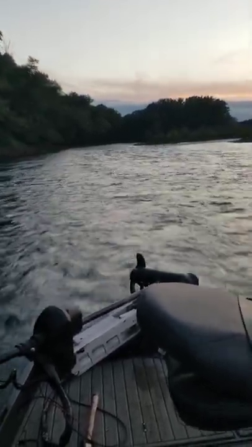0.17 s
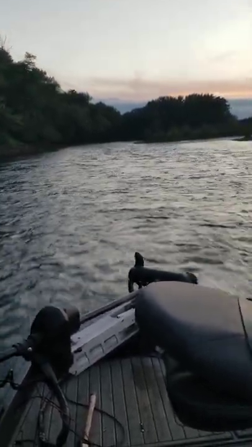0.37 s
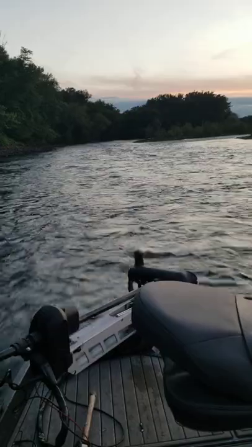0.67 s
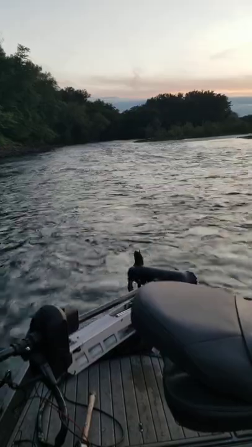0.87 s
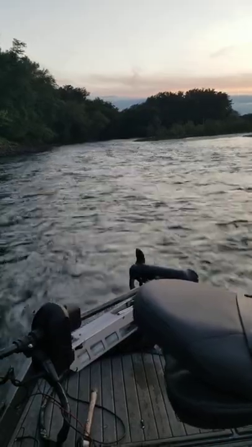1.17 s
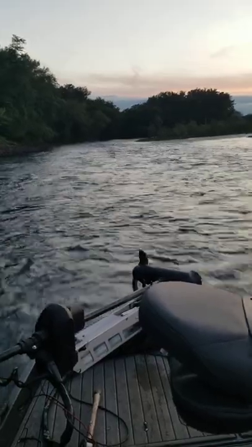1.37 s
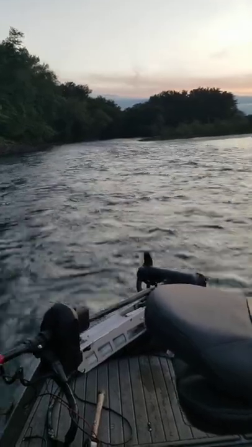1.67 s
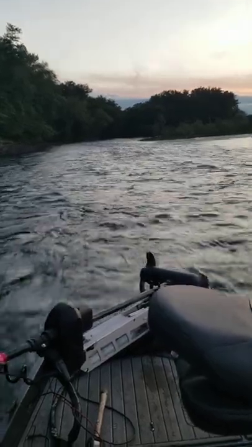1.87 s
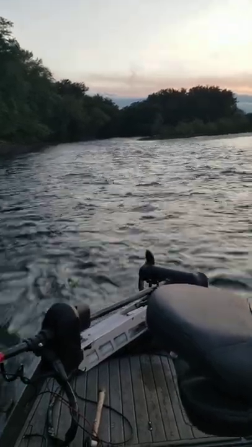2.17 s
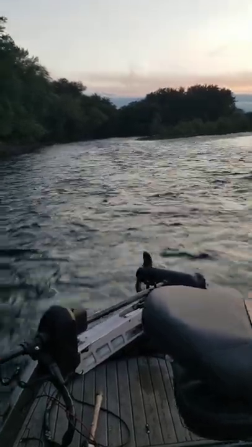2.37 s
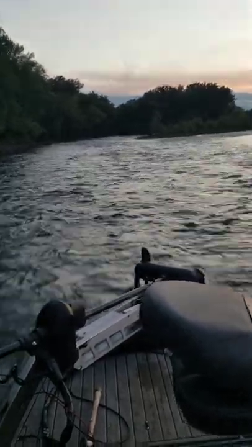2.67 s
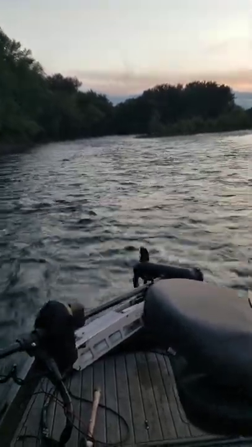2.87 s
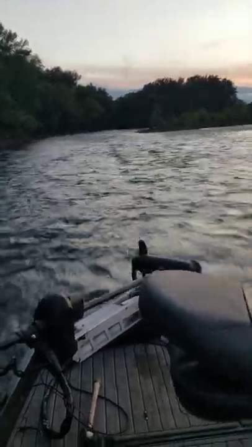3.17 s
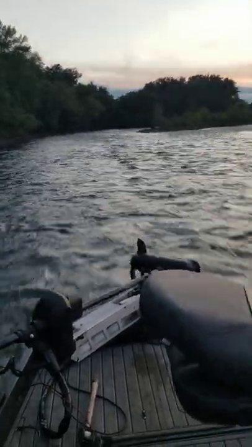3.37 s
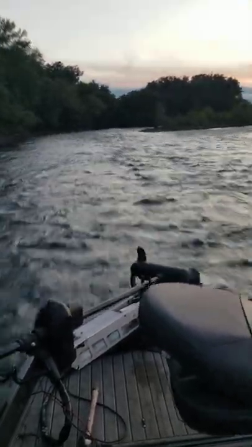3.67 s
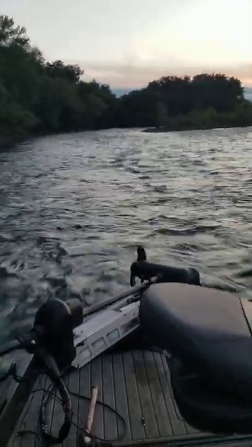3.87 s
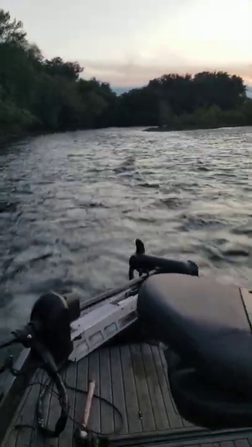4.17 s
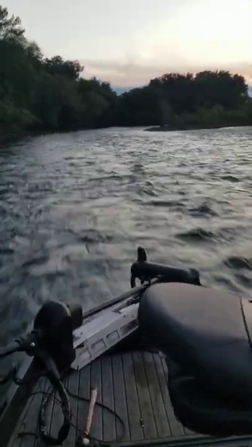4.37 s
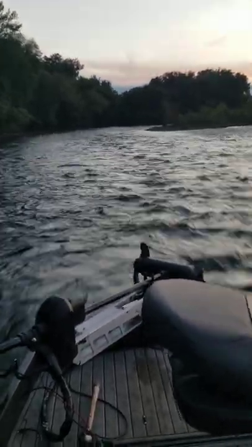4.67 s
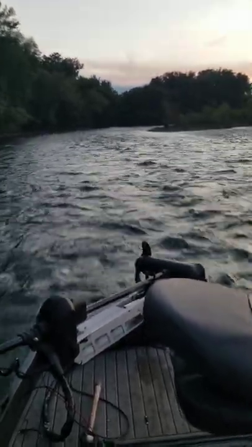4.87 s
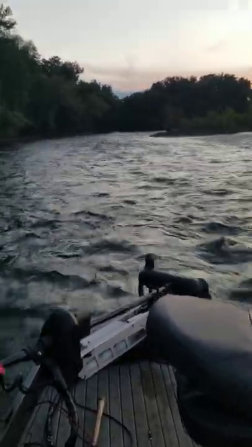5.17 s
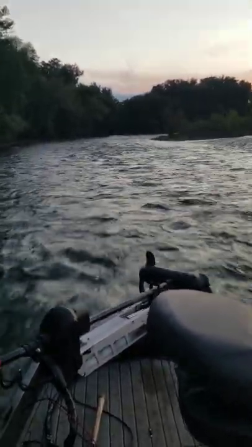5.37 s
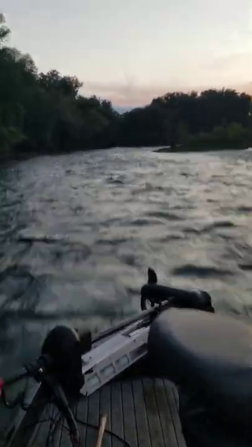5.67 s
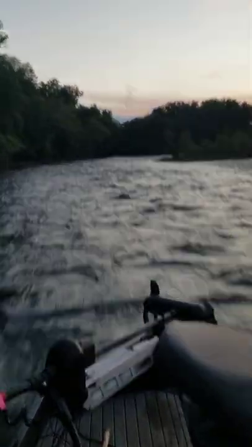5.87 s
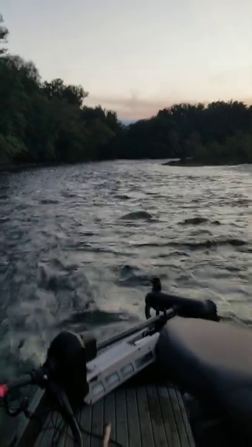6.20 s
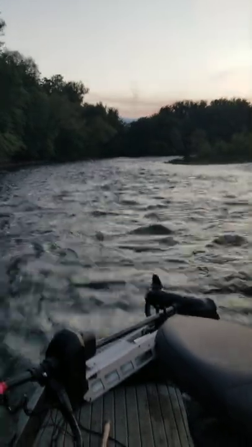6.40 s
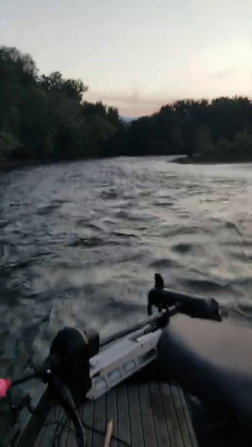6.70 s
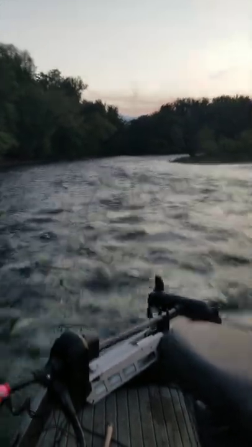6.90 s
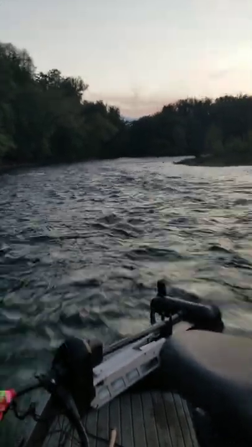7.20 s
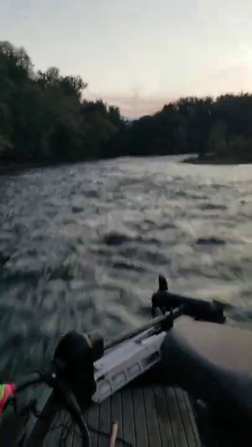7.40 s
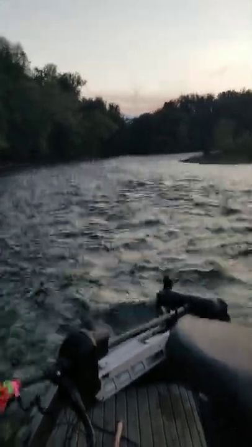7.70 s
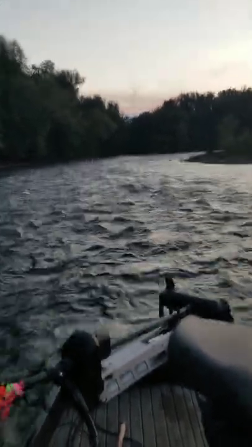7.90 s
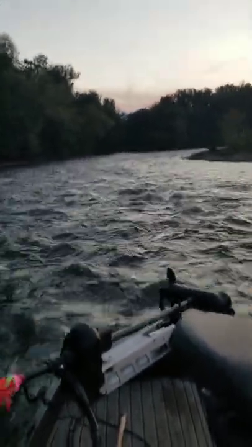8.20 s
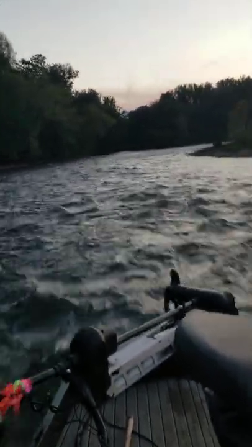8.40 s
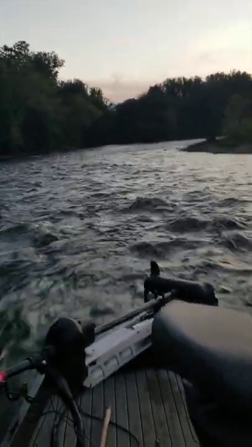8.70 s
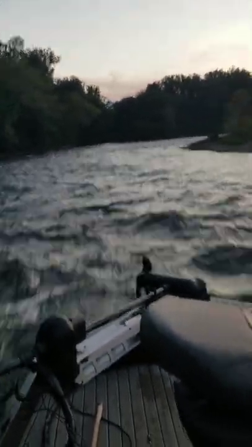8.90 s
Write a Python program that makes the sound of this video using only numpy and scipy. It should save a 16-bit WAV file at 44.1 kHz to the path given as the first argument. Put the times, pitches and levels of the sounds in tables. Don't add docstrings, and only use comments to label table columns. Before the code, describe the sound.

Steady run upriver in a motorboat: deep pulsing hum, faint high whine, rushing wind and water, sharp little slaps on sheet metal.

```python
import sys
import numpy as np
from scipy import signal
from scipy.fft import rfft, irfft, next_fast_len
from scipy.io import wavfile
from scipy.ndimage import uniform_filter1d

SR = 44100
rng = np.random.default_rng(int(sys.argv[2]) if len(sys.argv) > 2 else 0)


def to_wav(s):
    ch = np.atleast_2d(s).T
    pcm = np.round(np.clip(ch, -1, 1) * 32767)
    wavfile.write(sys.argv[1], SR, pcm.astype(np.int16))


def magnitude_from_level(level_db):
    exponent = np.asarray(level_db, float) / 20
    return 10 ** exponent


N = 399098
SIZE = next_fast_len(N)

# [multiple of its rate, left level/dB, right level/dB, lag of the left port/rad]
SHAFT_TONES = [(1, -20.0, -20.0, 0.3), (2, -31.0, -30.0, 0.5), (3, -42.0, -42.0, 0.5),
               (4, -35.0, -34.0, 0.6), (5, -31.0, -33.0, 0.9), (6, -30.0, -30.0, 0.7),
               (7, -35.0, -36.0, 1.4), (8, -39.0, -42.0, 0.8), (9, -40.0, -43.0, 1.1),
               (10, -41.5, -41.5, 0.2), (11, -41.0, -47.0, -2.6), (12, -44.0, -36.0, 1.9),
               (13, -42.0, -41.0, 2.6), (14, -43.0, -37.0, -3.0), (15, -49.0, -47.0, -3.0),
               (16, -54.0, -50.0, -0.7), (17, -52.0, -52.0, 2.8), (18, -60.0, -50.0, -0.4),
               (19, -41.0, -36.0, -1.5), (20, -60.0, -47.0, -2.8), (21, -64.0, -60.0, 1.8),
               (22, -68.0, -60.0, -0.8), (23, -61.0, -55.0, -0.0), (24, -60.0, -54.0, 0.8),
               (25, -53.0, -58.0, -1.5), (26, -62.0, -60.0, 2.3)]
SPREAD = 0.4
HUNT_HZ = 0.09
CRUISE_HZ = 79.37
OCTAVE_DB_PER_HZ, THIN_DB_PER_HZ = 8, 0.5

# [t/s, f/Hz, level/dB]
WHINE = [(0, 1507, -42), (0.25, 1507, -41), (0.5, 1497, -48), (0.8, 1501, -42), (1.75, 1508, -41),
         (2.6, 1507, -39), (2.9, 1503, -43), (3.2, 1507, -38), (4.2, 1506, -41), (4.47, 1512, -44),
         (4.85, 1501, -41), (5.15, 1504, -44), (5.4, 1511, -39), (5.97, 1510, -45), (6.3, 1514, -41),
         (6.75, 1510, -39), (7.5, 1507, -43), (8.1, 1513, -41)]
BLADE_MULTIPLE = 19

# [loudest t/s, level/dB, out-of-step t/s before it, dip/dB]
THROBS = [(0.24, 5.5, -0.1, 10), (0.9, 3, 0.53, 16), (1.74, 5, 1.25, 8), (2.47, 3.5, 2.04, 14),
          (3.17, 4.5, 2.8, 8), (3.7, -1, 3.54, 14), (4.1, 5, 3.87, 10), (4.48, 0, 4.38, 9),
          (4.75, 5, 4.6, 11), (5.44, 5, 5.2, 20), (6.15, 5.5, 5.8, 14), (6.76, 3, 6.62, 15),
          (7.63, 6, 7.3, 20), (8.33, 2, 8.08, 24), (8.93, 2, 8.75, 17), (9.5, 2, 9.12, 12)]
THROB_PEAK = 2.6

# [multiple of its rate, level/dB]
ROTOR_TONES = [(3, -37.5), (4, -45), (5, -41.5), (9, -55)]
SLIP_HZ = 1.36

# [f/Hz, width/Hz, level/dB]
PANELS = [(250, 40, -37), (443, 16, -34.5), (519, 24, -37), (600, 60, -46), (830, 30, -51), (985, 30, -46),
          (1262, 25, -53), (2520, 150, -53), (3150, 120, -56), (4080, 400, -58)]

# [f/Hz, left level/dB per Hz, right level/dB per Hz]
RUSH = [(22, -82, -73), (46.7, -45, -52.5), (70, -42.5, -46.5), (110, -50, -45), (187, -51, -44.5),
        (360, -56, -48), (620, -61, -55.5), (1150, -67, -63), (1750, -74, -69), (2600, -75.5, -73),
        (5480, -85.5, -82), (7100, -93.5, -92.5), (11100, -97, -87.5), (11950, -96, -82.5)]
LAG_S = 0.00048

# [t/s, length/s, buffet level/dB, wind level/dB]
GUSTS = [(0.7, 0.14, 0, -0.5), (1.03, 0.47, 5.5, -1), (2.598, 0.17, 2, 0), (3.25, .25, 6, 0.5),
         (3.61, .12, 4, 0.5), (3.927, 0.14, 7, 1), (4.384, .12, 5, -0.5), (4.66, 0.24, -3, 1.5),
         (5.25, 0.58, 5, 3), (5.903, 0.26, 8, 3), (6.693, 0.097, 8, 1.5), (7.002, 0.32, 3, 1),
         (7.64, 0.16, -3, -1), (7.855, 0.14, 7, 2.5), (8.32, 0.23, 4, 0.5), (8.79, 0.2, 4, 3.5)]
BUFFET_SWAY_DB, WIND_SWAY_DB, LULL_DB = 1, 0.7, 4.2

# [t/s, level/dB against its mean]
SPRAY = [(0, 2.5), (0.35, 0), (2.1, 2.5), (2.45, 1), (3.2, 2), (3.5, -0.5), (3.7, 2.2), (4.35, 2.5),
         (4.75, 3), (5.3, 3.5), (5.6, 1.5), (7.05, 2), (7.3, 5), (7.5, 2.5), (8.2, 2), (8.47, 3.5),
         (8.65, 5), (9.0, 3)]
SHEET_DB, SHEET_S = 2.5, 0.057

# [t/s, peak level/dB, ring f/Hz, fizz level/dB against the ring]
SLAPS = [(0.9472, -31, 3240, -19), (0.9867, -29, 2910, -15), (2.9597, -26, 3900, -19),
         (3.817, -29, 2920, -18), (4.395, -21.5, 2720, -8), (4.4638, -25.5, 2620, -16),
         (4.7965, -24.5, 3030, -27), (5.162, -29, 3040, -12), (5.2165, -26, 2720, -22),
         (5.469, -23.5, 2660, -22), (5.694, -26, 3590, -10), (5.708, -18, 2520, -8),
         (5.727, -32, 2700, -23), (5.8803, -25.5, 2690, -18), (5.9577, -25, 2720, -11),
         (6.0615, -25, 2560, 0), (6.4727, -28, 3680, -15), (6.6757, -22.5, 3070, -10),
         (7.225, -28, 3050, -13), (7.443, -25.5, 2590, -3), (7.651, -26, 2600, -13),
         (7.8094, -23, 3220, -2), (7.8526, -26, 2980, -13), (7.873, -18.5, 3060, -19),
         (7.9526, -23, 3160, -14), (8.072, -22, 3000, -5), (8.3719, -29, 3290, -7),
         (8.6133, -33, 3090, -14), (8.754, -26, 3100, -19), (8.9366, -30, 3000, -25)]
CRACK_DB, CRACK_PER_FIZZ = -20, 0.42
SLAP_FADE_S = 0.046


def curves(table):
    s, *columns = np.transpose(table)
    return [np.interp(np.arange(N) / SR, s, column) for column in columns]


def walk(rate):
    hold = int(SR / rate)
    steps = np.repeat(rng.standard_normal(N // hold + 1), hold)
    smooth = uniform_filter1d(uniform_filter1d(steps, hold), hold)
    return 1.23 * smooth[:N]


def ring(x, hz, width_hz):
    return signal.lfilter(*signal.iirpeak(hz, hz / width_hz, fs=SR), x)


def ports(x, lag_s, pan_db=0):
    left = np.roll(x, int(lag_s * SR)) * magnitude_from_level(pan_db / 2)
    return np.array([left, x * magnitude_from_level(-pan_db / 2)])


def throb():
    t = np.arange(N) / SR
    loud_s, top_db, weak_s, dip_db = np.transpose(THROBS)
    half_turns = np.interp(t, np.ravel([weak_s, loud_s], "F"), np.arange(2 * len(THROBS)))
    trough = magnitude_from_level(-np.interp(t, weak_s, np.abs(dip_db)))
    in_step = np.abs(np.sin(np.pi / 2 * half_turns)) ** THROB_PEAK
    power = trough ** 2 + (1 - trough ** 2) * in_step
    return np.interp(t, loud_s, top_db) + 10 * np.log10(power)


def motor(turns):
    out, left = np.zeros((2, N)), np.array([[1], [0]])
    whine_hz, whine_db = curves(WHINE)
    faster_hz = whine_hz / BLADE_MULTIPLE - CRUISE_HZ
    octave_db = OCTAVE_DB_PER_HZ * faster_hz + 2.5 * walk(10)
    whine_db = whine_db - np.median(whine_db) + 0.6 + 1.3 * walk(14)
    special_db = {1: throb(), 2: octave_db, BLADE_MULTIPLE: whine_db}
    for k, left_db, right_db, late in SHAFT_TONES:
        start = SPREAD * k ** 2 + 0.6 * walk(6)
        if k in special_db:
            sway_db = special_db[k]
        else:
            sway_db = 1.2 * walk(3) + 2.2 * walk(14) - THIN_DB_PER_HZ * k * faster_hz
        level = magnitude_from_level(np.array([[left_db], [right_db]]) + sway_db)
        out += np.sqrt(2) * level * np.cos(2 * np.pi * k * turns - late * left + start)
    rotor_turns = turns - SLIP_HZ * np.arange(N) / SR
    for k, db in ROTOR_TONES:
        level = magnitude_from_level(db + 0.73 * walk(1.83))
        out += np.sqrt(2) * level * np.cos(k * (2 * np.pi * rotor_turns - 0.12 * left))
    return out


def panels():
    out = np.zeros(N)
    for hz, width_hz, db in PANELS:
        drone = ring(ring(rng.standard_normal(N), hz, width_hz), hz, 2 * width_hz)
        out += magnitude_from_level(db) * drone / drone.std()
    return ports(out, 0.00028, pan_db=4.5)


def swells(rows):
    t = np.arange(0, N / SR + 0.01, 0.005)
    db = sum(top * np.exp(-(2 * (t - s) / length) ** 2) for s, length, top in rows)
    return np.interp(np.arange(N) / SR, t, db)


def weather():
    gusts = np.array(GUSTS)
    buffet = LULL_DB + swells(gusts[:, [0, 1, 2]]) + BUFFET_SWAY_DB * walk(9)
    wind = LULL_DB / 2 + swells(gusts[:, [0, 1, 3]]) + WIND_SWAY_DB * walk(9)
    sheets = []
    for s, db, _, fizz_db in SLAPS:
        fizzy = np.clip((db + fizz_db + 49) / 12, 0, 1)
        sheets.append((s + SHEET_S / 4, SHEET_S, SHEET_DB * fizzy))
    spray = curves(SPRAY)[0] + swells(sheets)
    return np.array([buffet, wind, 0.28 * spray, spray])


def rush(turns):
    hz = np.arange(SIZE // 2 + 1) * SR / SIZE + 1e-3
    table_hz, *port_levels = np.transpose(RUSH)
    colour = np.array([magnitude_from_level(np.interp(np.log(hz), np.log(table_hz), db)) for db in port_levels])
    own = rfft(rng.standard_normal((2, SIZE)))
    common = rfft(rng.standard_normal(SIZE))
    delay = np.exp(-2j * np.pi * hz * LAG_S * np.array([[1], [0]]))
    share = 0.38 / (1 + (hz / 1500) ** 4) + 0.28 / (1 + (hz / 60) ** 4)
    noise = np.sqrt(1 - share) * own + np.sqrt(share) * common * delay
    noise = noise * colour * np.sqrt(SR / 2)
    controls = weather()
    where = np.log([50, 180, 5000, 11000])
    out, gurgle = np.zeros((2, N)), walk(12)
    for step in range(20):
        place = 2 * np.log2(hz / 22) - step
        window = np.cos(np.pi / 2 * np.clip(place, -1, 1)) ** 2
        band = irfft(noise * window, SIZE)[:, :N]
        centre = np.log(22) + step * np.log(2) / 2
        weights = np.array([np.interp(centre, where, row) for row in np.eye(4)])
        wet = weights[2] + weights[3]
        flicker_db = 0.7 * np.array([walk(14), walk(14)])
        out += band * magnitude_from_level(weights @ controls + wet * (0.6 * gurgle + flicker_db))
    return out * (1 + 0.04 * np.cos(2 * np.pi * turns))


def peak_one(x):
    return x / np.abs(x).max()


def slap(peak_db, hz, crack_db, fizz_db, fade_s):
    t = np.arange(int(0.08 * SR)) / SR
    hit, foam, rough = rng.standard_normal((3, len(t)))
    ragged = magnitude_from_level(6 * uniform_filter1d(rough, size=60) * np.sqrt(60))
    splash = np.exp(-t / 0.0009) + 0.4 * ragged * magnitude_from_level(-40 * t / fade_s)
    body = ring(ring(hit * splash, hz, 2500), 1.2 * hz, 3600)
    crack = ring(ring(hit * splash, 10400, 6200), 10600, 8900)
    fizz = ring(ring(foam * splash, 14000, 6000), 14000, 9000)
    bright = magnitude_from_level(crack_db + 6.0) * peak_one(crack) + magnitude_from_level(fizz_db - 0.5) * peak_one(fizz)
    return magnitude_from_level(peak_db) * (peak_one(body) + bright)


def waves(count=300):
    out = np.zeros(N + SR)
    blows = []
    for s, size, pitch in rng.random((count, 3)):
        drop_db = -42 - 1.7 * np.log(1 - size)
        blows.append((s * N / SR, drop_db, 2300 + 2500 * pitch, -9, -12, 0.03))
    for s, db, hz, fizz_db in SLAPS:
        crack_db = CRACK_DB + CRACK_PER_FIZZ * fizz_db
        blows.append((s, db, hz, crack_db, fizz_db, SLAP_FADE_S))
    for s, *blow in blows:
        sound = slap(*blow)
        first = int(s * SR)
        out[first:first + len(sound)] += sound
    return ports(out[:N], 0.0003, pan_db=-11.0)


def scene():
    shaft_hz = curves(WHINE)[0] / BLADE_MULTIPLE + HUNT_HZ * walk(7)
    turns = np.cumsum(shaft_hz) / SR
    return motor(turns) + panels() + rush(turns) + waves()


def roll_off(x):
    return signal.sosfilt(signal.butter(12, 15710, fs=SR, output="sos"), x)


def record(dry):
    rounded = np.tanh(0.41 * dry) / 0.39
    treble_cut = signal.ellip(8, 0.2, 60, 15650, fs=SR, output="sos")
    mix = signal.sosfilt(treble_cut, rounded)
    return roll_off(mix)


dry = scene()
out = record(dry)
to_wav(out)
```